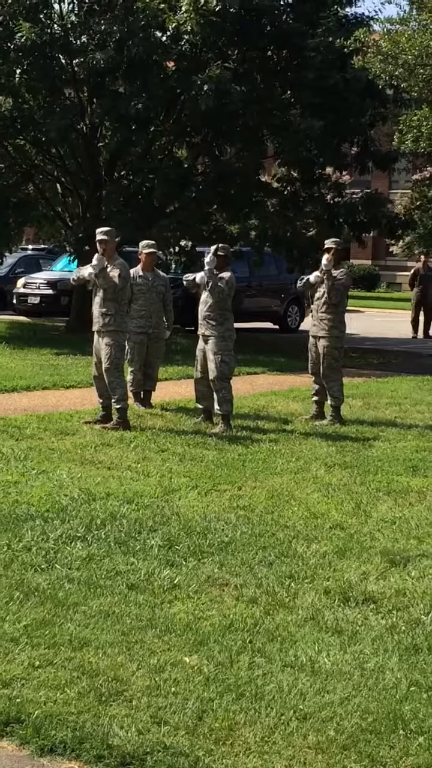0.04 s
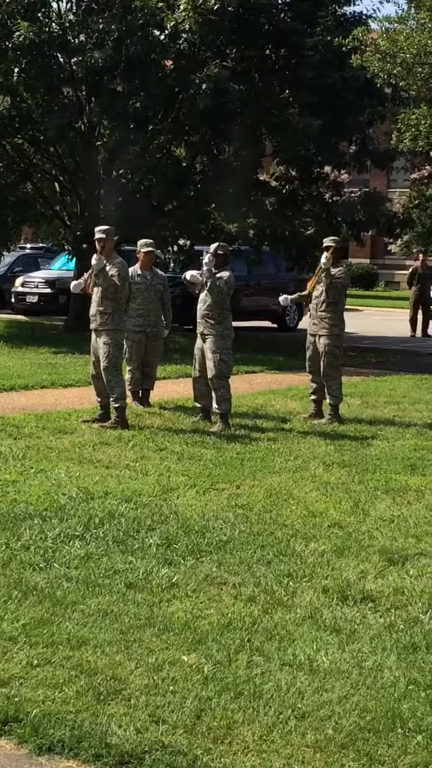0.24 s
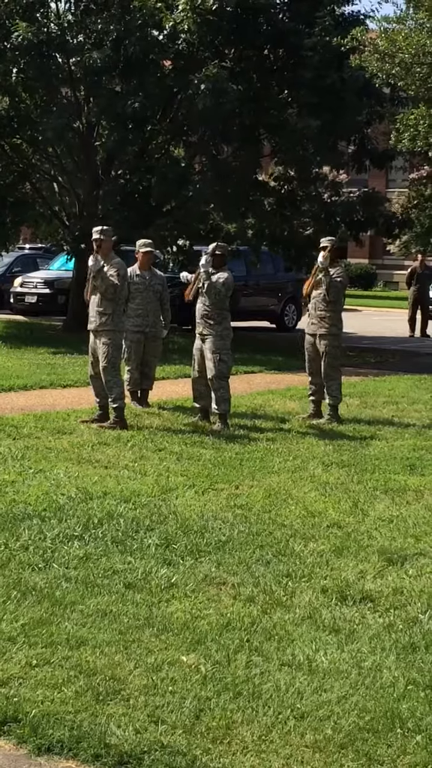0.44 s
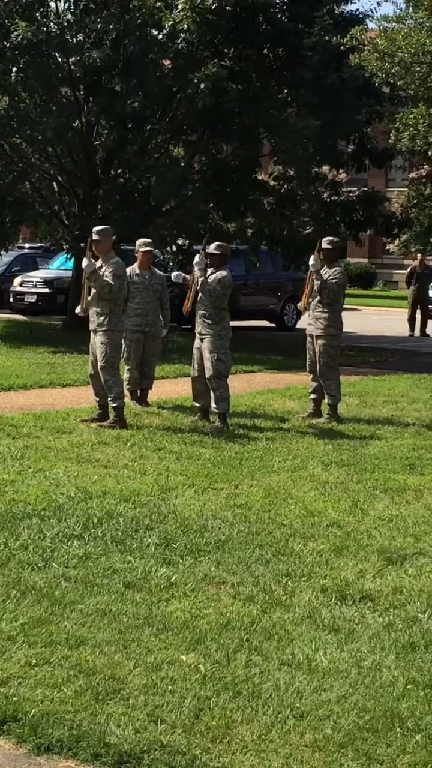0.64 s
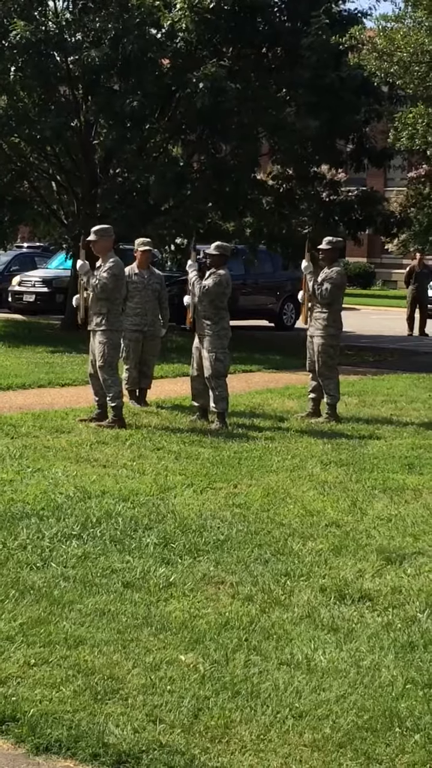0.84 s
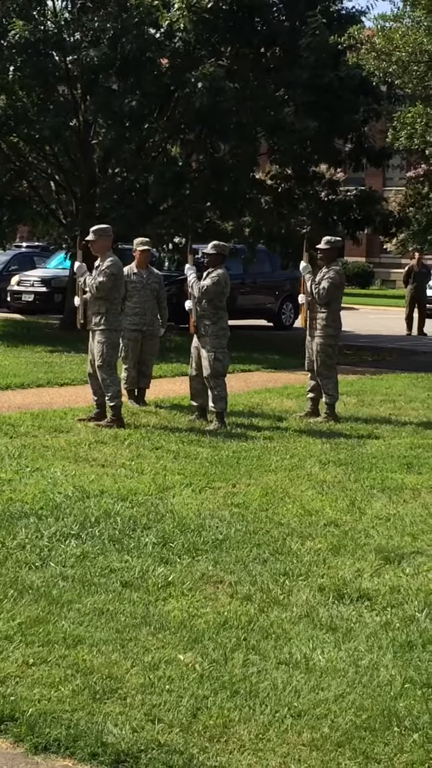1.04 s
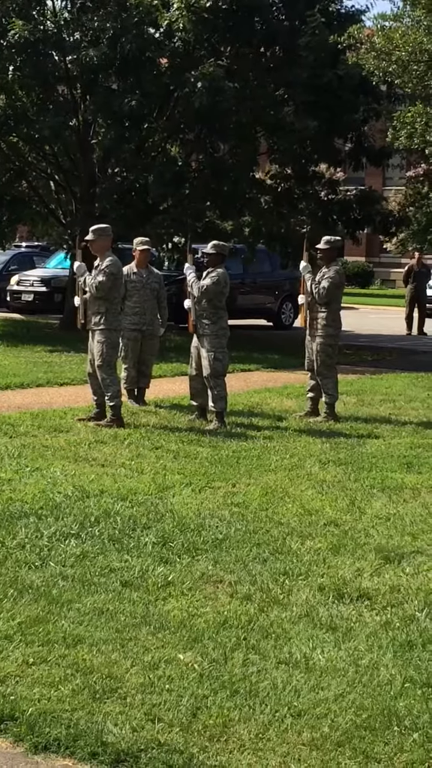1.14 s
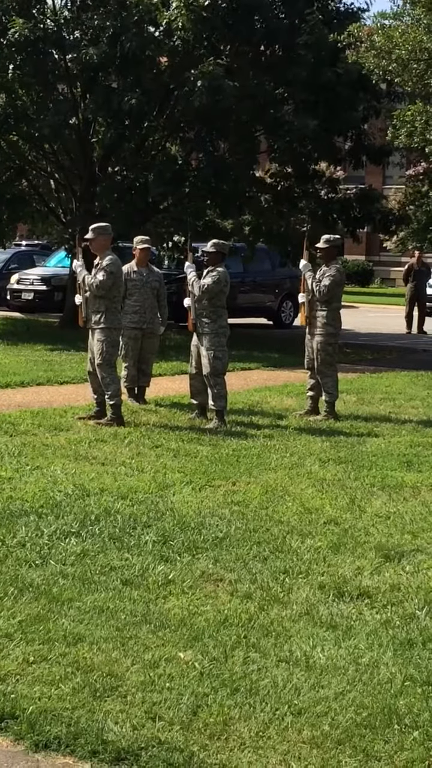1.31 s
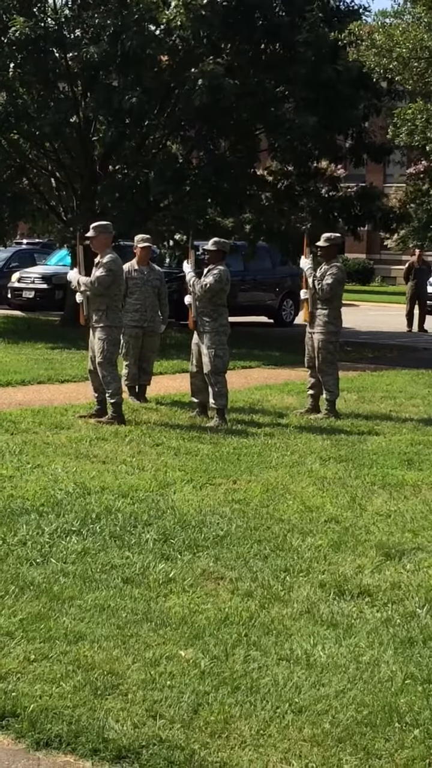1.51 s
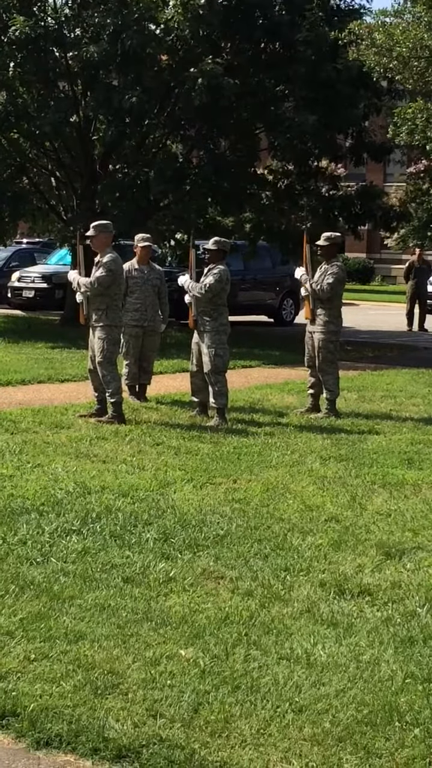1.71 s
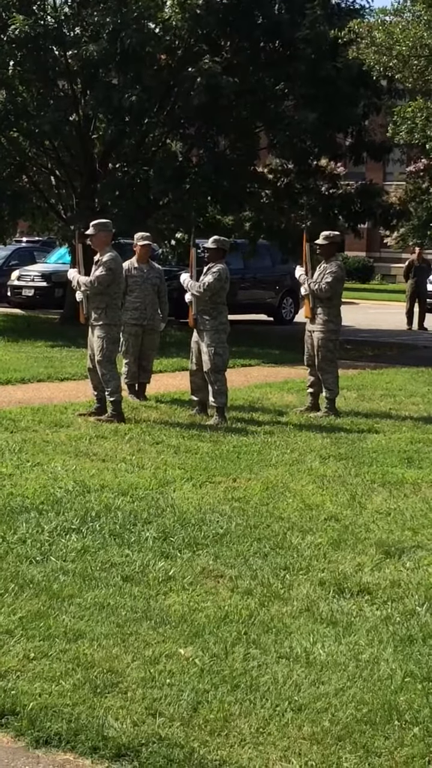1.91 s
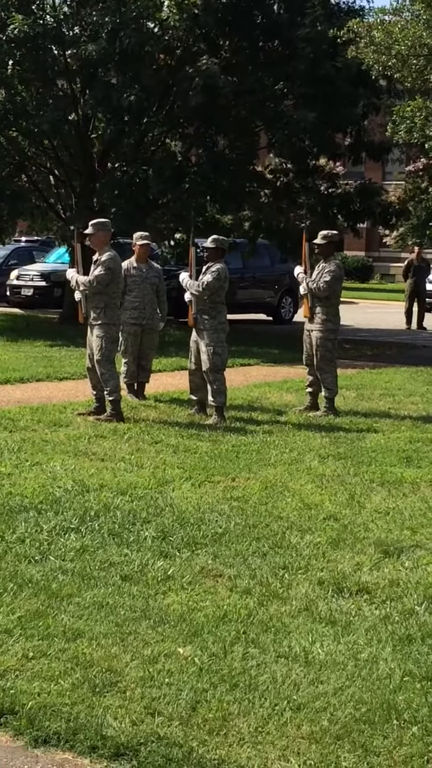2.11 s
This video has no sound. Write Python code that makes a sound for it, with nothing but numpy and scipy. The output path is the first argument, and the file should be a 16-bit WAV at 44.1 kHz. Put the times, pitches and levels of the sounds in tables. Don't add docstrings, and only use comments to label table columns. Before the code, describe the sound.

Several rifles fire almost together outdoors, a harsh overloaded blast followed by slapping, rolling echoes

```python
import sys
import numpy as np
from scipy import signal
from scipy.io import wavfile

SR = 44100
rng = np.random.default_rng(int(sys.argv[2]) if len(sys.argv) > 2 else 0)


def inscribe(sig):
    pcm = np.round(np.clip(np.atleast_2d(sig).T, -1, 1) * 32767)
    wavfile.write(sys.argv[1], SR, pcm.astype(np.int16))


def volts_from_decibels(level):
    exponent = np.asarray(level, float) / 20
    return 10 ** exponent


N = 94815


def energy(db):
    return volts_from_decibels(2 * np.asarray(db, float))


def rms_one(x):
    return x / np.sqrt(np.mean(x ** 2) + 1e-20)


def at_hz(points, hz):
    points_hz, values = np.transpose(points)
    return np.interp(np.log(hz), np.log(points_hz), values)


def bandpass(x, low_hz, high_hz):
    sos = signal.butter(2, [low_hz, high_hz], "band", fs=SR, output="sos")
    return signal.sosfilt(sos, x)


def drift(rate_hz):
    hop, settle = 40, 2000
    r = np.exp(-2 * np.pi * rate_hz * hop / SR)
    white = rng.standard_normal(N // hop + settle + 2)
    slow = signal.lfilter([1], [1, -2 * r, r * r], white)[settle:]
    slow = rms_one(slow - slow.mean())
    return np.interp(np.arange(N) / hop, np.arange(len(slow)), slow)


def clicks(start_s, height):
    out = np.full(N, 1e-18)
    np.add.at(out, (np.asarray(start_s) * SR).astype(int), height)
    return out


def dying(power, t60_s):
    return signal.lfilter([1], [1, -energy(-60 / (t60_s * SR))], power)


def ring(x, hz, width_hz):
    r = np.exp(-np.pi * width_hz / SR)
    w = 2 * np.pi * hz / SR
    return signal.lfilter([0, np.sin(w)], [1, -2 * r * np.cos(w), r * r], x)


def bands(shape):
    edges_hz = 22 * 2 ** np.arange(0, 10, .5)
    white = rng.standard_normal((2, N))
    out = 0
    for k, (low, high) in enumerate(zip(edges_hz, edges_hz[1:])):
        out = out + bandpass(white[k % 2] * shape(np.sqrt(low * high)), low, high)
    return out


def puffs(rows):
    out = 0
    for start_s, peak_db, center_hz, t60_s in rows:
        burst = np.sqrt(dying(clicks([start_s], 1), t60_s)) * rng.standard_normal(N)
        burst = bandpass(burst, center_hz / 1.585, center_hz * 1.208)
        out = out + volts_from_decibels(peak_db) * burst / np.abs(burst).max()
    return out


# freq_hz, density_db_per_hz
AIR_SPECTRUM = [(25, 9), (60, -2.5), (124, 4.5), (270, -16), (500, -12.5), (1800, -25.5), (6000, -34.5),
                (15000, -57)]


def air():
    level_db, patchy_db, flicker_hz = -37, 1.5, 4.7

    def shape(hz):
        flicker_db = patchy_db * min(400 / hz, 1) ** 0.65 * drift(flicker_hz)
        return volts_from_decibels(at_hz(AIR_SPECTRUM, hz) + flicker_db)
    return volts_from_decibels(level_db) * rms_one(bands(shape))


# pitch_hz, waver_hz, flicker_db
CRICKET_CHORUSES = [
    (2920, 9, 2.4),
    (2396, 9, 2.0),
    (1362, 12, 3.0),
]
# time_s, high_db, middle_db, low_db
CRICKET_LEVELS = [(0, -62, -76, -55.5), (.15, -56, -67, -63), (.75, -62, -51.5, -75),
                  (.86, -50, -58.5, -85), (1.2, -62, -57, -64), (1.235, -71, -49, -64),
                  (1.29, -52.5, -56.5, -66), (1.38, -56, -56, -66), (1.53, -45, -54, -62),
                  (1.6, -49, -58.5, -62), (1.71, -46, -59, -58.5), (1.77, -58.5, -65, -60),
                  (1.87, -55.5, -51, -59), (1.96, -60, -56.5, -66), (2.0, -51, -62, -66),
                  (2.09, -48, -68, -60), (2.12, -64, -68, -63), (2.15, -44, -68, -67)]


def crickets():
    out, t = 0, np.arange(N) / SR
    time_s, *levels_db = np.transpose(CRICKET_LEVELS)
    for (pitch_hz, waver_hz, flicker_db), level_db in zip(CRICKET_CHORUSES, levels_db):
        phase = 2 * np.pi * np.cumsum(pitch_hz + waver_hz * drift(11.9)) / SR
        song_db = np.interp(t, time_s, level_db) + flicker_db * drift(68)
        out = out + volts_from_decibels(song_db) * np.sqrt(2) * np.sin(phase)
    return out


# center_hz, width_hz, level_db, lag_throbs, throb_depth (0-1), noise_over_clicks
CICADA_RESONANCES = [(5000, 300, -1.5, .46, .12, .6), (5330, 250, -5, .42, .1, .7),
                     (5860, 200, -4, .75, .1, .6), (6200, 1400, 0, .8, .05, 1.5),
                     (6681, 110, -3, .86, .6, .2), (7736, 500, -5, .8, .15, .8),
                     (8400, 700, -8, .82, .15, .8), (10300, 2500, -14, .8, .1, 2.5),
                     (12000, 500, -20, .83, .2, .6), (12850, 300, -26, .8, .2, .6)]
# time_s, level_db
CICADA_EFFORT = [(0, -62), (.3, -68), (.8, -64), (1.15, -58.5), (1.45, -58), (1.6, -62.5), (2.15, -59.5)]


def cicadas():
    throb_hz, clicks_per_throb, jitter_s = 50.2, 4, .00003
    t = np.arange(N) / SR
    beats_s = np.arange(.002, N / SR - .01, 1 / (throb_hz * clicks_per_throb))
    train = clicks(beats_s + jitter_s * rng.standard_normal(len(beats_s)), 1)
    buzz = 0
    for center_hz, width_hz, level_db, lag, depth, rough in CICADA_RESONANCES:
        gate = (1 + depth * np.cos(2 * np.pi * (throb_hz * t + lag))) ** 2
        clicked = ring(ring(train, center_hz, width_hz), center_hz, width_hz)
        hiss = ring(ring(rng.standard_normal(N), center_hz, width_hz), center_hz, width_hz)
        tone = rms_one(clicked) + rough * rms_one(hiss)
        buzz = buzz + volts_from_decibels(level_db + 1.6 * drift(2.5)) * rms_one(gate * tone)
    return volts_from_decibels(np.interp(t, *np.transpose(CICADA_EFFORT))) * buzz


# start_s, level_db
SLING_TAPS = [
    (.0405, -78),
    (.045, -30.5),
    (.06, -74),
    (.113, -40),
    (.121, -38),
]
# pitch_hz, level_db, t60_s
SLING_MODES = [(8091, -12, .16), (10930, -3, .08), (7090, -20, .3)]


def sling_clinks():
    start_s, tap_db = np.transpose(SLING_TAPS)
    out = 0
    for pitch_hz, mode_db, t60_s in SLING_MODES:
        taps = clicks(start_s, volts_from_decibels(tap_db + mode_db - 39.0))
        out = out + ring(ring(taps, pitch_hz, 1.2 / t60_s), pitch_hz, 260)
    return out


# start_s, peak_db, center_hz, t60_s
WALL_SLAPS = [(.672, -21.5, 1010, 0.12), (.673, -21.5, 455, 0.15), (.676, -24.5, 1590, 0.053),
              (.69, -20, 750, 0.055), (.825, -30, 810, .05), (.70, -16.5, 417, 0.19),
              (.70, -37, 2260, 0.18), (.715, -20.5, 100, 0.14), (.733, -22, 1280, 0.047),
              (.736, -23, 305, 0.093), (.748, -14.5, 610, 0.14), (.765, -24, 700, 0.056),
              (.768, -16, 168, 0.15), (.70, -15.5, 122, 0.078), (.78, -18, 545, 0.082),
              (.81, -22.5, 700, 0.051), (1.012, -19.5, 130, 0.05), (1.055, -24, 120, 0.091),
              (1.09, -24.5, 184, 0.17), (1.125, -26, 183, 0.083), (1.15, -23.5, 213, 0.2),
              (1.18, -24, 192, 0.062), (1.213, -20.5, 132, 0.071), (1.245, -29, 300, .1),
              (1.495, -32, 153, 0.026), (1.56, -31, 119, 0.042), (1.585, -32, 434, 0.25)]


def wall_slaps():
    return puffs(WALL_SLAPS)


# start_s, peak_db, center_hz, t60_s
SHARP_SLAPS = [
    (.9318, -28, 650, .008),
    (.932, -32, 3200, .007),
    (.9675, -28, 700, .008),
    (.9683, -31, 2200, .007),
    (.9683, -33, 3700, .006),
    (1.0035, -29, 900, .008),
    (1.0032, -34, 3400, .009),
]


def sharp_slaps():
    return puffs(SHARP_SLAPS)


# start_s, peak_db, center_hz, t60_s
FIRING_PINS = [(.198, -29, 170, .06), (.21, -22, 110, .1), (.2037, -36, 5400, .014),
               (.206, -41, 11000, .014), (.208, -42, 8000, .01), (.2126, -21, 1000, .03),
               (.2152, -17, 750, .03), (.2155, -40, 5500, .015), (.216, -43, 11000, .015),
               (.2183, -16, 900, .025), (.2245, -17, 700, .02)]


def firing_pins():
    return puffs(FIRING_PINS)


# start_s, peak_db, center_hz, t60_s
BLAST_SURGES = [(.2267, -9.5, 2050, 0.034), (.2275, -2, 5100, 0.0084), (.2505, -6.5, 633, 0.047),
                (.253, -8.5, 2360, 0.013), (.287, -16, 410, 0.017), (.292, -13.5, 181, 0.28),
                (.306, -15, 195, 0.043), (.343, -9, 210, 0.02), (.356, -12, 244, 0.13),
                (.364, -6.5, 392, 0.06), (.372, -13, 320, 0.07), (.44, -15, 205, 0.19),
                (.447, -17, 2530, 0.022), (.477, -17.5, 2560, 0.054), (.535, -39, 2370, 0.041),
                (.277, -12, 3500, .008), (.2885, -13, 4000, 0.0075), (.311, -14, 3000, .01),
                (.317, -13, 1990, 0.0072), (.3275, -10, 2480, 0.007), (.358, -13, 2520, 0.0059),
                (.375, -12, 1750, 0.0082)]


def blast_surges():
    return puffs(BLAST_SURGES)


# start_s, level_db, brightness_db_per_octave
BLAST_HITS = [(0.226, -8.5, 1.5), (0.2398, -31, 6.5), (0.2494, -11.5, 0.5), (0.259, -13, 0.5),
              (0.2673, -21, 4.5), (0.2863, -8, -3), (0.3076, -13, 2.5), (0.317, -11.5, 1), (0.326, -13, 1),
              (.345, -13, 0), (0.355, -10.5, -1), (0.366, -14, -1.5), (0.373, -12, -0.5), (0.4459, -22, 0),
              (0.4769, -27, -5)]
# freq_hz, density_db_per_hz
CRACK_SPECTRUM = [(24, -30), (60, -7), (185, -1.5), (330, -8), (600, -5), (1440, -14.5), (8340, -23.5),
                  (15500, -31)]
# freq_hz, t60_s
SCATTER_DECAY = [(60, 0.48), (300, 0.5), (1500, 0.68), (5000, 0.55), (12000, 0.41), (16000, 0.18)]
# delay_s, level_db, dulling_db_per_octave, smear_s, scatter_share_db
FACADE_RETURNS = [
    (0.444, -6, -6, .008, -7.5),
    (0.799, -13.5, -5.5, 0.054, -1),
    (.91, -15.5, -8.5, 0.21, -4),
    (1.332, -19.5, -15, 0.0083, -3),
]
# freq_hz, gain_db
LONG_PATH = [(50, 2.5), (110, 1.5), (270, -8), (500, -0.5), (3000, 4), (6000, -27), (12000, -28)]


def volley():
    pulse_ms, pulse_db = 1.67, 3
    crack_t60_s, scatter_db = 0.022, -7.5
    roll_db, roll_t60_s, roll_tilt_db = -22, 3.33, -4
    start_s, hit_db, tilt_db = np.transpose(BLAST_HITS)

    def shape(hz):
        octaves = np.log2(hz / 500)
        path_db = at_hz(LONG_PATH, hz)
        hits = clicks(start_s, energy(hit_db + tilt_db * octaves))
        crack = dying(hits, crack_t60_s)
        scatter = energy(scatter_db) * dying(hits, at_hz(SCATTER_DECAY, hz))
        band_roll_db = roll_db + roll_tilt_db * max(octaves, -1) + path_db
        power = crack + scatter + energy(band_roll_db) * dying(hits, roll_t60_s)
        for delay_s, level_db, dull_db, smear_s, share_db in FACADE_RETURNS:
            r = np.exp(-1 / (smear_s * SR))
            lag = int(delay_s * SR)
            back = signal.lfilter([1 - r], [1, -r], crack + energy(share_db) * scatter)
            return_db = level_db + dull_db * max(octaves, 0) + path_db
            power[lag:] += energy(return_db) * back[:N - lag]
        return volts_from_decibels(at_hz(CRACK_SPECTRUM, hz) + 15.5) * np.sqrt(power)
    ramp = np.linspace(1, -1, int(pulse_ms * SR / 1000))
    pulses = np.convolve(clicks(start_s, -volts_from_decibels(hit_db + pulse_db)), ramp)[:N]
    return bands(shape) + bandpass(pulses, 150, 2500)


def scene():
    background = air() + crickets() + cicadas() + sling_clinks()
    echoes = wall_slaps() + sharp_slaps()
    shots = firing_pins() + blast_surges() + volley()
    return (background + echoes + shots)[None]


def band_limit(x):
    return signal.sosfilt(signal.butter(12, 16510, fs=SR, output="sos"), x)


def record(dry):
    mic_low_hz, ceiling, top_hz = 60.4, 0.66, 16500
    x = signal.sosfilt(signal.butter(2, mic_low_hz, "high", fs=SR, output="sos"), dry)
    x = ceiling * np.tanh(x / ceiling)
    x = signal.sosfilt(signal.cheby2(12, 70, top_hz, fs=SR, output="sos"), x)
    return band_limit(x)


dry = scene()
out = record(dry)
inscribe(out)
```